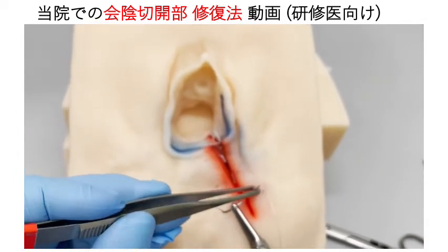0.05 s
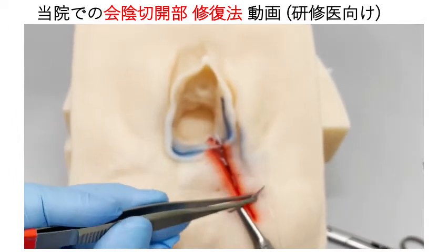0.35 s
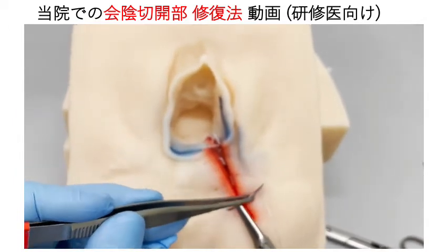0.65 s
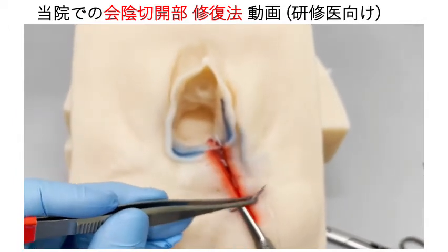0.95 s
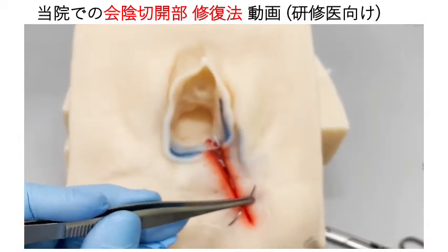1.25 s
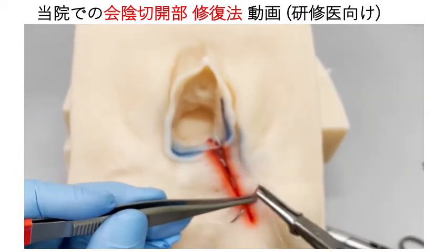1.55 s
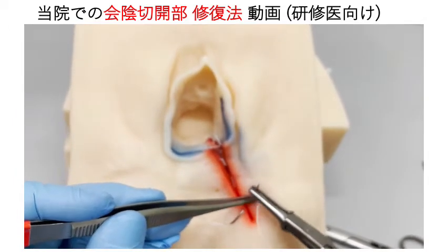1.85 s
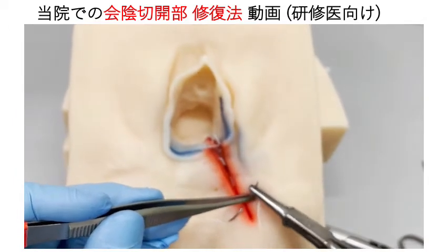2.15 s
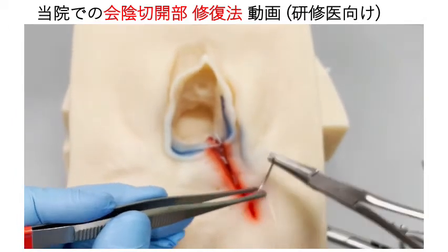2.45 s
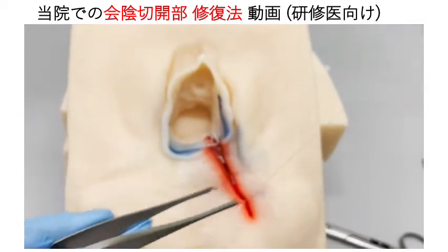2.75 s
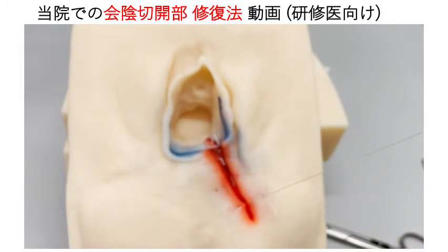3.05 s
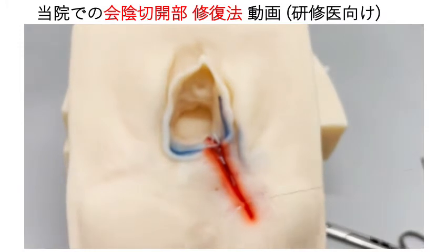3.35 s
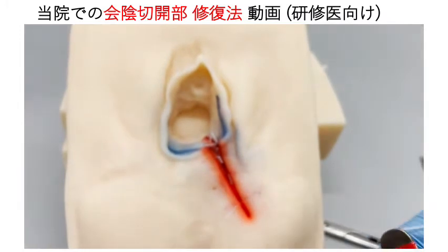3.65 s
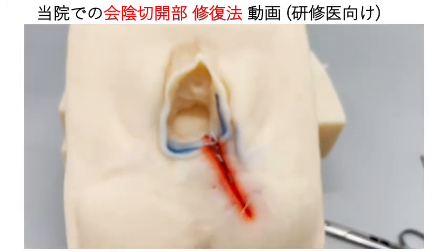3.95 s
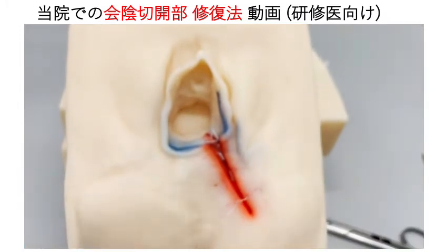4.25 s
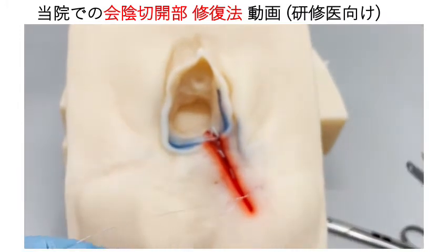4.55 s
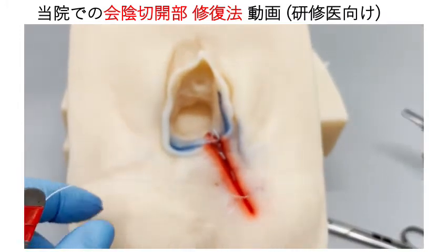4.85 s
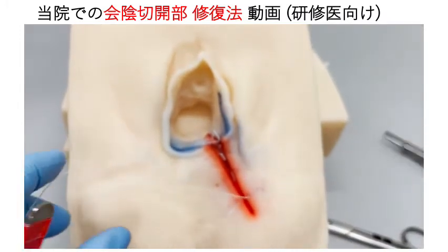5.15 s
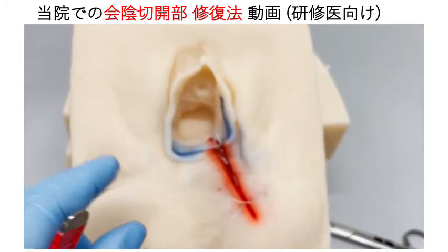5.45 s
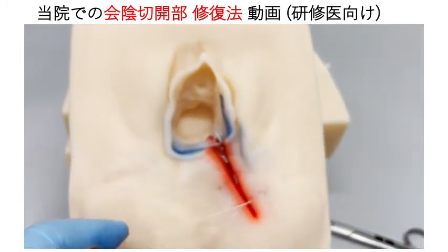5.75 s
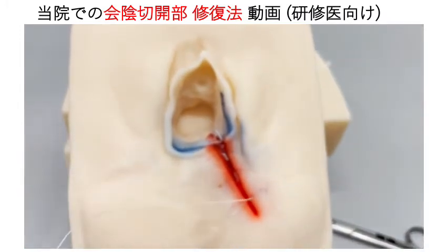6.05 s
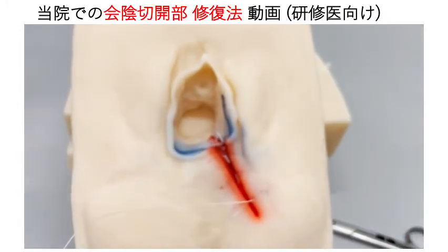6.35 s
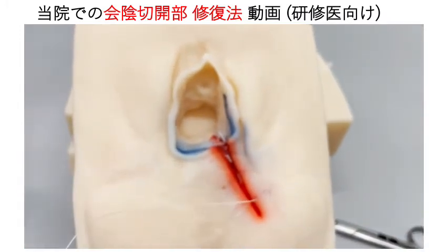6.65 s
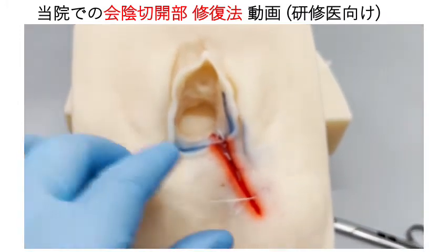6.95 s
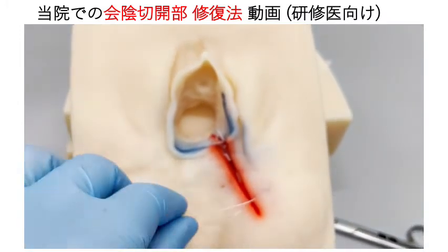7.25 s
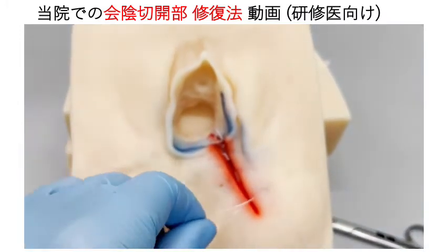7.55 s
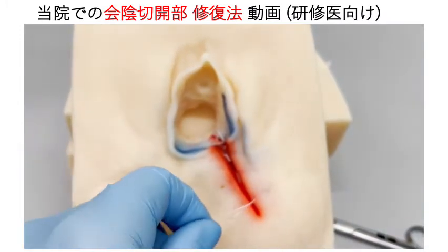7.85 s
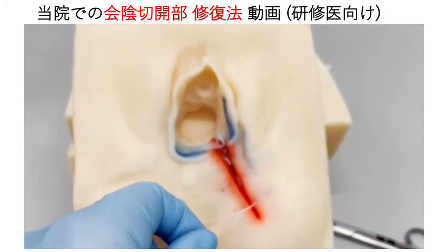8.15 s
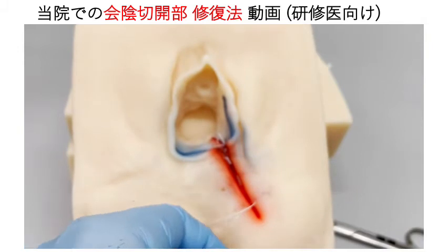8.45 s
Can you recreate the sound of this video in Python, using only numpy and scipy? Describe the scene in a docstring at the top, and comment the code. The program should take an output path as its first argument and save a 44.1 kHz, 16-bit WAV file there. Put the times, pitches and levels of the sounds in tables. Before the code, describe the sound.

Small steel instruments click over a low ventilation rumble, then a drawer farther off knocks, rolls and bangs in a small room.

```python
"""A small, quiet room, one microphone, suturing practice on a foam model. Close by, a steel needle holder
and forceps click and ring faintly, gloves and thread rustle with friction, and something sticks and slips
in a soft squeak. Farther off something like a drawer knocks open, rolls, hits its stop and is knocked
again; its panels resound and the room answers. Ventilation rumbles underneath."""
import sys
import numpy as np
from scipy import signal
from scipy.fft import rfft, irfft, next_fast_len
from scipy.io import wavfile
from scipy.ndimage import uniform_filter1d, map_coordinates

SR = 44100
rng = np.random.default_rng(int(sys.argv[2]) if len(sys.argv) > 2 else 0)


def output_pcm(signal):
    """Save a mono or channel-first signal as 16-bit PCM at the path in sys.argv[1].

    Samples are clipped to [-1, 1] before scaling.
    """
    pcm = np.clip(np.atleast_2d(signal).T, -1, 1) * 32767
    wavfile.write(sys.argv[1], SR, np.round(pcm).astype(np.int16))


N = 375732


def amp(db):
    return 10 ** (np.asarray(db) / 20)


def unit_rms(x):
    return x / np.sqrt(np.mean(x ** 2) + 1e-20)


def unit_energy(x):
    return x / (np.linalg.norm(x) + 1e-12)


def fade(t, t60):
    return np.exp(-np.log(1000) * t / np.maximum(t60, 1e-3))


def along(points, hz):
    """Interpolate (frequency [Hz], value) points on a log axis."""
    freqs, values = np.transpose(points)
    return np.interp(np.log(hz + 1), np.log(freqs + 1), values)


def bumps(rows, f):
    """Gain of bell-shaped peaks and dips."""
    return amp(sum(db * np.exp(-((f - hz) / width) ** 2) for hz, width, db in rows))


def blend(parts, levels, f):
    """Gain of several spectra together, each at its own level."""
    return np.sqrt(sum((amp(db) * unit_rms(amp(along(part, f)))) ** 2 for part, db in zip(parts, levels)))


def wobble(rate):
    """A smooth random curve, rate knots a second."""
    return map_coordinates(rng.standard_normal(int(N * rate / SR) + 4), [np.arange(N) * rate / SR])


def add(track, start, sound):
    """Mix a sound into the track at start seconds."""
    part = track[max(round(start * SR), 0):][:len(sound)]
    part += sound[:len(part)]


def coloured(x, gain):
    """x through the causal filter with the given gain at each frequency."""
    size = 2 * next_fast_len(len(x) // 2 + 4096)
    cepstrum = irfft(np.log(np.maximum(gain(np.fft.rfftfreq(size, 1 / SR)), 1e-6)))
    cepstrum[1:size // 2] *= 2  # fold to minimum phase
    cepstrum[size // 2 + 1:] = 0
    return irfft(rfft(x, size) * np.exp(rfft(cepstrum)), size)[:len(x)]


def noise(spectrum, grain_db=0, grain_rate=300):
    """Noise of rms 1; friction makes it catch and slip in grains."""
    grains = rng.standard_normal(N) * amp(grain_db * wobble(grain_rate))
    size = next_fast_len(N)
    gain = amp(along(spectrum, np.fft.rfftfreq(size, 1 / SR)))
    return unit_rms(irfft(rfft(grains, size) * gain, size)[:N])


def contact(t60, chatter, rise_s=0, sparse_db=4):
    """A blow and a dying chatter of uneven recontacts; a scuffing one takes time to rise."""
    t = np.arange(1, SR // 4) / SR
    sizes = rng.standard_normal(len(t)) * amp(sparse_db * rng.standard_normal(len(t)))
    force = chatter * unit_energy(sizes * fade(t, t60))
    force[0] += 1
    return unit_energy(force * (1 - np.exp(-t / max(rise_s, 1e-6))))


def ring(hz, db, t60):
    """One dying mode."""
    t = np.arange(SR // 2) / SR
    return amp(db) * fade(t, t60) * (1 - np.exp(-t / 0.001)) * np.sin(2 * np.pi * hz * t)


def motion(length, stop_t60, rise_share=0.13, sag_db_per_s=12.5):
    """Speed of a movement, top 1: it builds for a share of the length, sags steadily, then stops."""
    t = np.arange(SR) / SR
    attack = (1 - np.exp(-t / max(rise_share * length, 1e-3))) ** 2
    speed = attack * amp(-sag_db_per_s * t) * fade(np.maximum(t - length, 0), stop_t60)
    return speed / speed.max()


# the small room's decay: (frequency [Hz], t60 [s])
ROOM_DECAY = [(100, 1), (250, 0.79), (600, 0.29), (2500, 0.3), (6000, 0.29), (14000, 0.27)]


def room(x, wet_db, early_db, early_t60=0.11, treble_db=0):
    """Direct sound, quick echoes off table and near walls, a diffuse tail; soft things absorb treble."""
    hz, frame_times, bands = signal.stft(rng.standard_normal(SR * 3 // 4), SR, nperseg=256)
    decay = fade(frame_times, along(ROOM_DECAY, hz)[:, None])
    tail = signal.istft(bands * decay, SR, nperseg=256)[1]
    t = np.arange(len(tail)) / SR
    onset = 1 - np.exp(-t / 0.006)
    early = rng.standard_normal(len(t)) * fade(t, early_t60)
    response = amp(wet_db) * unit_energy(tail * onset) + amp(early_db) * unit_energy(early * onset)
    response = coloured(response, lambda f: amp(along([(3000, 0.00039), (11000, treble_db)], f)))
    response[0] += 1  # straight to the microphone
    return signal.fftconvolve(x, response)


# room tone: (frequency [Hz], relative density [dB])
AIR_SPECTRUM = [(12, -46.5), (20, -14), (55, -1), (107, -11), (127, -12.5), (204, -12.5), (319, -22),
                (698, -28.5), (1440, -40), (1710, -41.5), (3340, -54), (4670, -45), (7950, -63),
                (12100, -55), (16000, -61)]
# fan motor: (frequency [Hz], level [dB])
FAN_HUM = [(48.4, -56.5), (96.9, -61.5)]


def ventilation(air_db=-52.5):
    """The bed under everything: steady rumbling air and a wavering motor hum."""
    t = np.arange(N) / SR
    hum = np.zeros(N)
    for hz, db in FAN_HUM:
        level = amp(db + 2 * wobble(10))
        hum += level * unit_rms(np.sin(2 * np.pi * hz * t + 0.42 * wobble(18)))
    return amp(air_db) * noise(AIR_SPECTRUM) + hum


# the squeak's course: (time [s], pitch [Hz], relative level [dB])
SQUEAK_PATH = [(.14, 1187, -66.5), (.19, 1258, -48.5), (.215, 1217, -55.5), (.24, 1165, -51),
               (.28, 1222, -70), (.32, 1216, -54.5), (.385, 1255, -55.5), (.42, 1200, -60.5),
               (.46, 1340, -71.5)]
# its harmonics 1 to 4: (relative level [dB])
SQUEAK_HARMONICS = [0, -13.5, -17, -31]
# its rasp: (frequency [Hz], relative density [dB])
RASP_SPECTRUM = [(1500, -31), (2450, 9), (3100, -4), (3700, 2.5), (4400, 1), (5500, -20)]


def squeak(gain_db=-1, jitter=0.013, rasp_db=-8):
    """A faint stick-slip squeak with an unsteady pitch and a rasp above it."""
    t = np.arange(N) / SR
    times, pitches, levels = np.transpose(SQUEAK_PATH)
    hz = np.interp(t, times, pitches) * (1 + jitter * wobble(400))
    phase = 2 * np.pi * np.cumsum(hz) / SR
    tone = unit_rms(sum(amp(db) * np.sin(k * phase) for k, db in enumerate(SQUEAK_HARMONICS, 1)))
    rasp = amp(rasp_db) * noise(RASP_SPECTRUM)
    gate = uniform_filter1d(1. * ((t >= times[0]) & (t <= times[-1])), size=600)
    envelope = gate * amp(np.interp(t, times, levels) + gain_db)
    return room(envelope * (tone + rasp), wet_db=-8, early_db=-4.5)[:N]


# pushes on the drawer: (time [s], length [s], relative level [dB], scrape offset [dB])
PUSHES = [(5.245, 0.19, -32, -20), (5.314, 0.077, -25, -18.5), (5.409, 0.35, -20.5, -25),
          (5.755, 0.056, -25, -8.5), (5.829, 0.17, -43.5, -19.5), (6.103, 0.14, -53, -14.5),
          (6.343, 0.044, -47.5, -22.5), (6.458, 0.22, -36.5, -10.5)]
# rumble and scrape of its runners, each: (frequency [Hz], relative density [dB])
RUMBLE_SPECTRUM = [(40, -14.5), (70, -17), (130, -7.5), (180, -8), (270, -1), (550, -1), (800, 2),
                   (1020, 1.5), (1300, -7), (2900, -16.5), (4200, -26), (7000, -39.5), (10000, -70)]
SCRAPE_SPECTRUM = [(2000, -13), (4000, 1.5), (6500, -9.5), (11000, -5.5), (15500, -12)]


def drawer_roll(rumble_db=-5.5, scrape_db=-5):
    """Rollers run over a rough track and slow with friction; the faster they go, the more they scrape."""
    rolling, scraping = np.zeros((2, N))
    for start, length, db, offset_db in PUSHES:
        speed = motion(length, stop_t60=0.18, rise_share=0.14, sag_db_per_s=39.5)
        add(rolling, start, amp(db) * speed)
        add(scraping, start, amp(db + offset_db) * speed ** 3.5)
    rumble = amp(rumble_db) * rolling * noise(RUMBLE_SPECTRUM, grain_db=1, grain_rate=240)
    scrape = amp(scrape_db) * scraping * noise(SCRAPE_SPECTRUM, grain_db=2.5, grain_rate=590)
    return rumble + scrape


# drawer blows: (time [s], relative panel level [dB], thud over panel [dB], hardness [dB], chatter t60 [s])
BLOWS = [(5.077, -27, 3, 12.5, 0.06), (5.095, -20.5, -10, 8, 0.059), (5.109, -21.5, -26, -1, 0.064),
         (5.119, -23, -6, 1.5, 0.031), (5.128, -29, -30, 5.5, 0.056), (5.363, -39, 2, -11.5, 0.047),
         (5.737, -34.5, -1, -5.5, 0.045), (5.7857, -19, -8, 8, 0.046), (5.991, -41, -0.5, 6.5, 0.024),
         (6.384, -39.5, -13, 0, 0.065), (6.4694, -44, -6, 15.5, 0.067), (6.565, -20, -21.5, 3, 0.035),
         (6.57, -18.5, -21.5, -2.5, 0.036), (6.606, -27.5, -24, -7, 0.07), (6.616, -26, -16.5, -4, 0.03),
         (6.791, -40, -4, -15.5, 0.063), (6.87, -45.5, 0, 6, 0.26), (6.918, -44.5, -5, -3.5, 0.16),
         (6.935, -44.5, -2, -7, 0.11), (6.993, -48, -1, -14, 0.063), (7.071, -50, -1.5, -6, 0.21)]
# a blow's thud, panel, clack, rattle and latch fizz, each: (frequency [Hz], relative density [dB])
BLOW_SPECTRA = [
    [(35, -24), (70, -15.5), (130, -4.5), (220, -9.5), (500, -32), (1000, -57.5)],
    [(70, -50), (130, -30.5), (270, 5), (600, 5.5), (1100, 5), (1500, -11.5), (3000, -42), (6000, -84.5)],
    [(700, -19.5), (1400, -3), (2700, -4.5), (4000, -11), (6000, -31.5), (9000, -46)],
    [(2000, -22.5), (4200, -4.5), (6000, -2), (7500, -12), (10000, -40)],
    [(6000, -20.5), (9000, 0), (11800, 6), (13500, -4.5), (15600, -9.5)],
]


def drawer_knocks(gain_db=30.5):
    """The drawer strikes its frame; harder blows are quicker and rattle more, and each stirs the room."""
    out = np.zeros(N)
    for start, db, thud_db, hard_db, t60 in BLOWS:
        clack_db, rattle_db, fizz_db = -6 + 0.33 * hard_db, -16.5 + 0.58 * hard_db, -21.5 + hard_db
        levels = db + np.array([thud_db, 0, clack_db, rattle_db, fizz_db])
        force = contact(t60, chatter=2.5, rise_s=0.0006 * amp(-hard_db))
        blow = coloured(force, lambda f: blend(BLOW_SPECTRA, levels, f))
        heard = room(blow, wet_db=-8.5, early_db=-5, early_t60=0.15, treble_db=-9)
        add(out, start, amp(gain_db) * np.linalg.norm(amp(levels)) * unit_energy(heard))
    return out


# the drawer's panel resonances: (frequency [Hz], half width [Hz], gain [dB])
PANEL_MODES = [(203, 35, -2), (276.6, 21, 3), (416, 24, 4), (578, 25, 4), (680, 27, 1.5), (960, 180, -1),
               (1010, 75, 2), (1316, 51, 4.5), (2010, 110, 2), (1730, 16, 4.5), (2245, 42, -1.5),
               (2356, 35, 3), (2900, 72, 2)]
# metal fittings after some blows: (time [s], frequency [Hz], level [dB], t60 [s])
FITTING_RINGS = [(5.789, 2234, -17, 0.1), (6.566, 1977, -12.5, 0.083), (6.872, 4800, -48, 0.18),
                 (6.922, 3950, -43, 0.093), (6.925, 2305, -37, 0.13), (7.078, 2150, -55, 0.17)]


def drawer(knock_db=1):
    """Farther off, blows and rolling shake the same panels and echo off the walls; fittings ring on."""
    shaking = amp(knock_db) * drawer_knocks() + drawer_roll()
    panels = coloured(shaking, lambda f: bumps(PANEL_MODES, f))
    out = room(panels, wet_db=-16, early_db=-10, early_t60=0.07, treble_db=-1.5)[:N]
    for start, hz, db, t60 in FITTING_RINGS:
        add(out, start, ring(hz, db, t60))
    return out


# hands never rest, relative levels: (press [dB], rub [dB], slide [dB])
RESTLESS_DB = (-65.5, -80, -92)
# glove strokes: (time [s], length [s], relative press [dB], relative rub [dB])
GLOVE_STROKES = [(0.092, 0.05, -55, -64), (0.113, 0.75, -65, -72), (1.009, 0.046, -87, -61.5),
                 (1.148, 0.079, -75, -65.5), (2.17, 0.2, -65, -77), (2.765, 0.36, -74, -72.5),
                 (3.094, 0.082, -51, -81), (3.228, 0.44, -66.5, -74.5), (3.627, 0.076, -46.5, -59),
                 (4.859, 0.059, -57.5, -79), (7.071, 0.54, -67.5, -70), (7.956, 0.055, -57, -53.5),
                 (8.068, 0.025, -68, -59.5), (8.246, 0.033, -59, -63), (8.295, 0.057, -56.5, -56.5)]
# needle and thread pulled through: (time [s], length [s], level [dB])
THREAD_PULLS = [(0.324, 0.084, -56), (1.035, 0.011, -58.5), (2.203, 0.22, -61), (2.96, 0.12, -69)]
# the model is nudged: (time [s], frequency [Hz], level [dB], t60 [s])
FOAM_NUDGES = [(0.083, 284, -41, 0.19)]
# friction of foam, glove and thread, each: (frequency [Hz], relative density [dB])
FOAM_SPECTRUM = [(100, -1.5), (170, 0.5), (290, 2), (420, -7), (650, -6.5), (1500, -14), (3000, -21.5),
                 (6000, -44)]
GLOVE_SPECTRUM = [(700, -24.5), (2000, 2), (4000, 3.5), (7000, -5.5), (9000, -26)]
THREAD_SPECTRUM = [(6000, -24), (9500, 2.5), (12000, 1.5), (14000, -8), (15600, -9.5)]


def hands(foam_db=-1, glove_db=-1, fizz_db=-12, swing_db=1.5):
    """Close by, gloves press and rub on the foam while needle and thread slide through it."""
    press, rub, slide = np.outer(amp(RESTLESS_DB), amp(swing_db * wobble(7)))
    for start, length, press_db, rub_db in GLOVE_STROKES:
        speed = motion(length, stop_t60=0.081)
        add(press, start, amp(press_db) * speed)
        add(rub, start, amp(rub_db) * speed)
    for start, length, db in THREAD_PULLS:
        add(slide, start, amp(db) * motion(length, stop_t60=0.1))
    foam = amp(foam_db) * press * noise(FOAM_SPECTRUM, grain_db=1.5, grain_rate=110)
    for start, hz, db, t60 in FOAM_NUDGES:
        add(foam, start, ring(hz, db, t60))
    rustle = noise(GLOVE_SPECTRUM, grain_db=1.5, grain_rate=290)
    fizz = amp(fizz_db) * noise(THREAD_SPECTRUM, grain_db=2.5)
    glove = amp(glove_db) * rub * (rustle + fizz)
    thread = slide * noise(THREAD_SPECTRUM, grain_db=7.5, grain_rate=260)
    return room(foam + glove + thread, wet_db=-6.5, early_db=-14, early_t60=0.18)[:N]


# steel on steel, and thread ticking as it slides at 0.392 s and 2.246 s: (time [s], relative treble level [dB],
# firmness [dB], chatter t60 [s])
TOUCHES = [(0.392, -49, -33, 0.01), (0.619, -82.5, 28.5, 0.0026), (0.741, -37, -9, 0.0086),
           (0.8792, -41, -14.5, 0.0064), (0.924, -37.5, -6, 0.017), (0.98, -50.5, -12, 0.019),
           (1.324, -72.5, -25, 0.004), (1.707, -66.5, -12, 0.012), (1.818, -66, -17, 0.012),
           (1.898, -66.5, -24, 0.011), (2.246, -48, -30, 0.018), (2.421, -46, -35, 0.028),
           (2.489, -61, -1.5, 0.012), (3.067, -61.5, 7, 0.01), (4.08, -48.5, 0.5, 0.016),
           (4.25, -51.5, -9, 0.011), (4.299, -43.5, -5, 0.01), (4.38, -52, -23, 0.016),
           (4.399, -53, -16, 0.018), (4.4856, -35.5, -1.5, 0.058), (4.596, -42, -4, 0.052),
           (4.616, -46, -2, 0.1), (7.178, -59, -17, 0.015), (7.761, -49, -1.5, 0.007),
           (8.4944, -57, 8.5, 0.01)]
# a touch's body, tick and treble, each: (frequency [Hz], relative density [dB])
STEEL_SPECTRA = [
    [(120, -8.5), (500, -3.5), (1500, -4), (3000, -5), (6000, -48)],
    [(1000, -9), (2400, -0.5), (6200, 5), (8500, -16), (11000, -30)],
    [(6000, -12.5), (9300, 2), (12000, 7), (13500, -3), (15600, 1)],
]
# a free steel tip: (time [s], frequency [Hz], level [dB], t60 [s])
TIP_RINGS = [(.926, 12280, -47, .2), (4.3, 12280, -56, .32), (4.381, 9300, -56, .06),
             (4.401, 9300, -56, .06)]


def steel_touches(gain_db=26):
    """Close by, jaws, needle and forceps meet and thread ticks as it slides; a firmer touch has more body, and
    a free tip rings on."""
    out = np.zeros(N)
    for start, db, firm_db, t60 in TOUCHES:
        tick_db = -2.5 + 0.84 * firm_db
        levels = db + np.array([firm_db, tick_db, 0])
        force = contact(t60, chatter=2.9, rise_s=0.0006)
        click = coloured(force, lambda f: blend(STEEL_SPECTRA, levels, f))
        heard = room(click, wet_db=-9.5, early_db=-7.5, early_t60=0.053, treble_db=-7.5)
        add(out, start, amp(gain_db) * np.linalg.norm(amp(levels)) * unit_energy(heard))
    for start, hz, db, t60 in TIP_RINGS:
        add(out, start, ring(hz, db, t60))
    return out


# the ratchet passes a tooth: (time [s], relative level [dB], low ring gain [dB], chatter t60 [s])
RATCHET_SNAPS = [(0.7003, -14.5, -2, 0.011), (2.1042, -19, 1, 0.014), (2.152, -19.5, 0.5, 0.01)]
# the needle holder's resonances: (frequency [Hz], width [Hz], relative level [dB])
HOLDER_MODES = [(1100, 510, -14), (2670, 810, -8), (3950, 960, -8), (5220, 2600, -7.5), (6100, 1300, -14),
                (8000, 1100, -10), (9750, 1100, 0.5), (11120, 830, 3.5), (12270, 280, -8),
                (15400, 770, -9.5)]


def ratchet(gain_db=16, floor_db=-19):
    """In the foreground, each tooth snaps into the hand-damped modes of the needle holder."""
    def modes(f):
        power = sum(amp(2 * db) / (1 + ((f - hz) / (width / 2)) ** 2) ** 2
                    for hz, width, db in HOLDER_MODES)
        return np.sqrt(power + amp(2 * floor_db))

    out = np.zeros(N)
    for start, db, low_db, t60 in RATCHET_SNAPS:
        low_shelf = [(6500, low_db), (9000, 0)]
        snap = coloured(contact(t60, chatter=1.4), lambda f: modes(f) * amp(along(low_shelf, f)))
        heard = room(unit_energy(snap), wet_db=-14, early_db=-7, early_t60=0.041, treble_db=-6.5)
        add(out, start, amp(db + gain_db) * heard)
    return out


def scene():
    """All that reaches the microphone, in mono."""
    return (ratchet() + steel_touches() + drawer() + hands() + squeak() + ventilation())[None]


# the microphone port: (frequency [Hz], half width [Hz], gain [dB])
PORT_DIPS = [(8146, 450, -19.5), (14550, 440, -17)]


def record(dry, ceiling=0.37, bottom_hz=32, top_hz=16000):
    """The microphone drops deep bass and top treble, has two treble dips and rounds off strong peaks."""
    high_pass = signal.butter(4, bottom_hz, "high", fs=SR, output="sos")
    low_pass = signal.ellip(10, .1, 80, top_hz, fs=SR, output="sos")
    ported = coloured(dry[0], lambda f: bumps(PORT_DIPS, f))
    heard = signal.sosfilt(high_pass, ported)
    rounded = heard / (1 + (heard / ceiling) ** 6) ** (1 / 6)
    return signal.sosfilt(low_pass, rounded)[None]


dry = scene()
out = record(dry)
output_pcm(out)
```